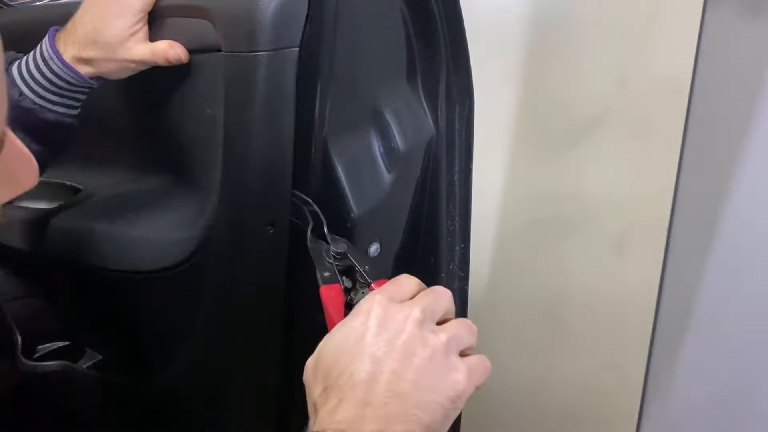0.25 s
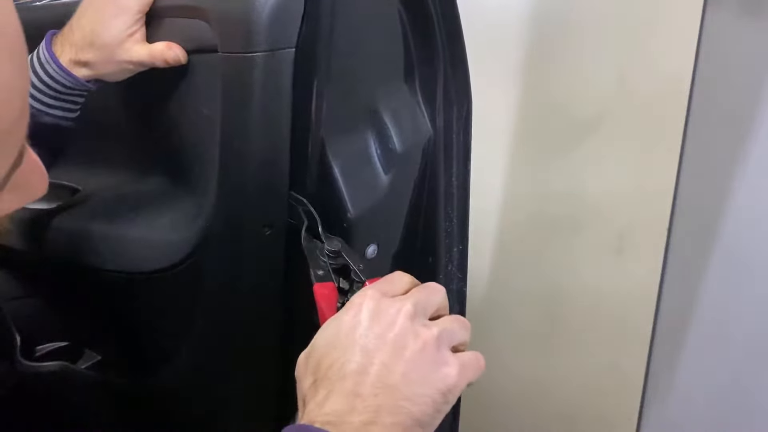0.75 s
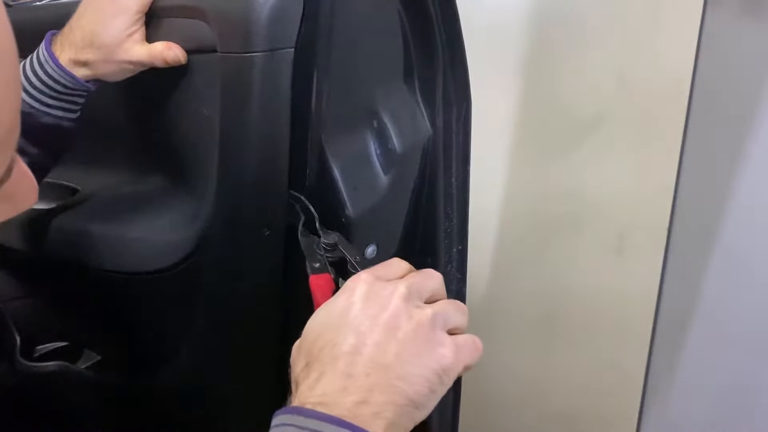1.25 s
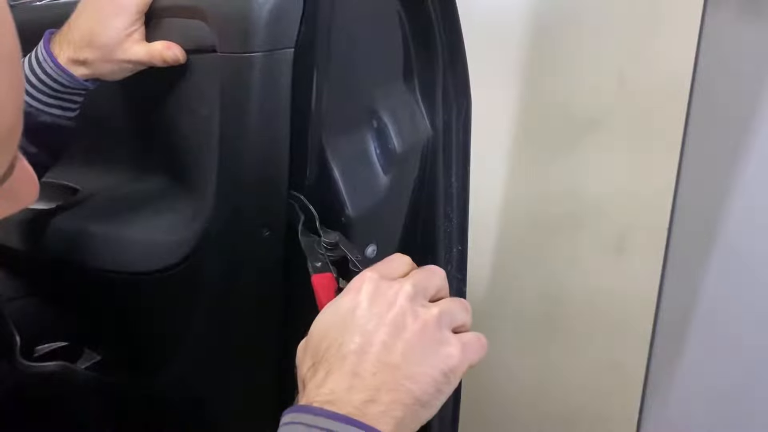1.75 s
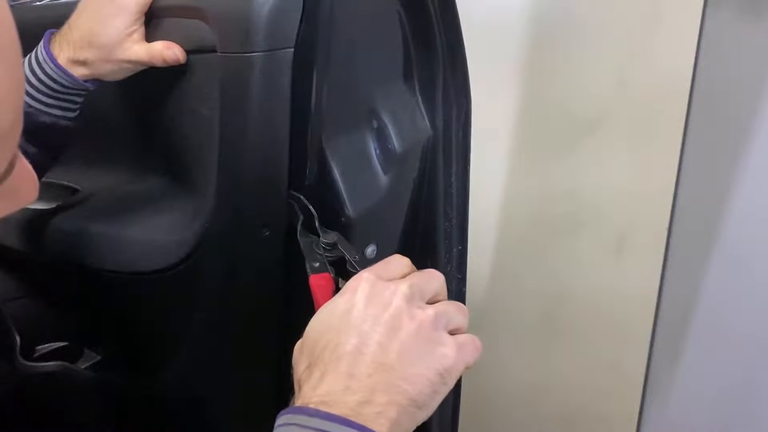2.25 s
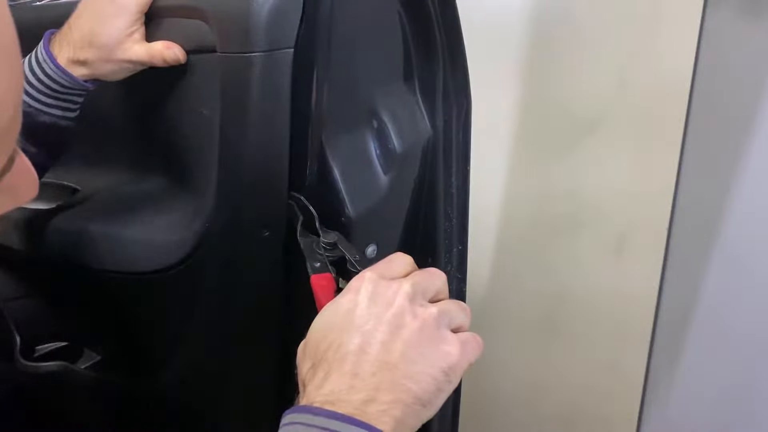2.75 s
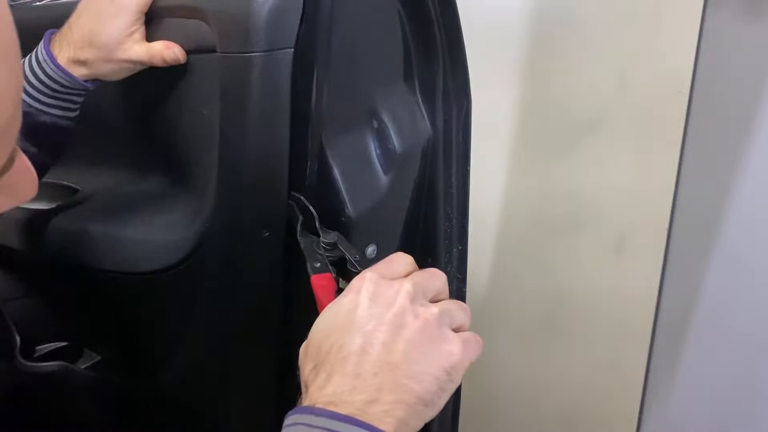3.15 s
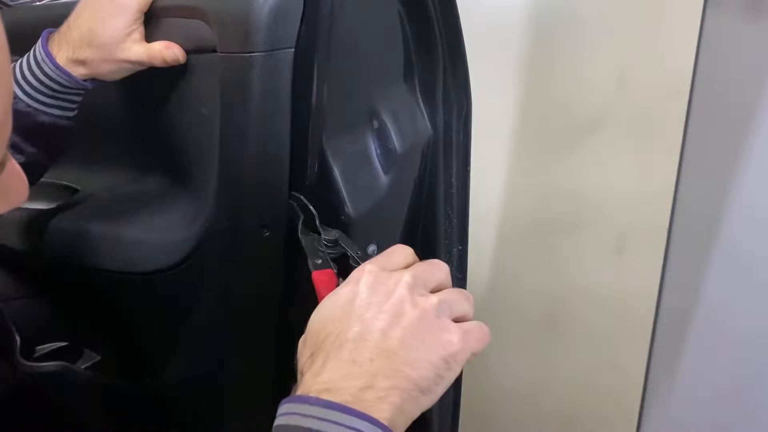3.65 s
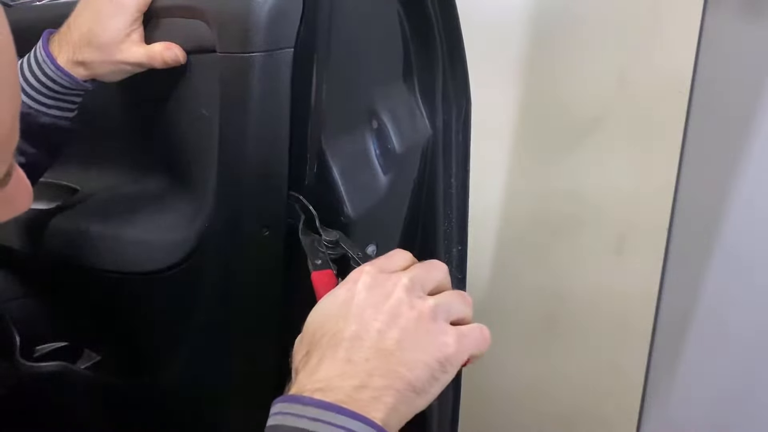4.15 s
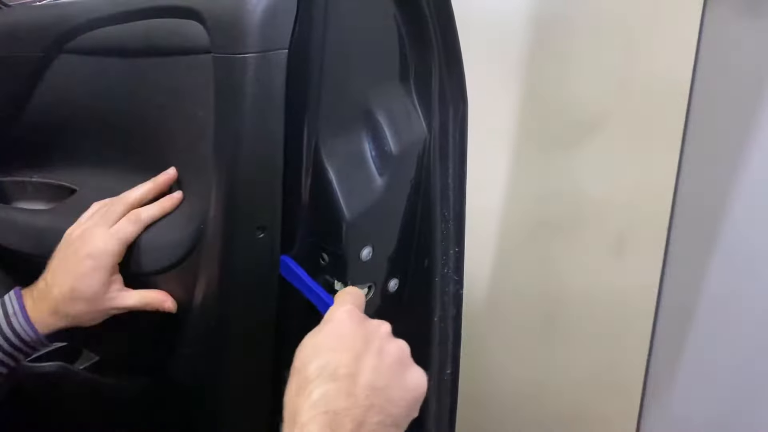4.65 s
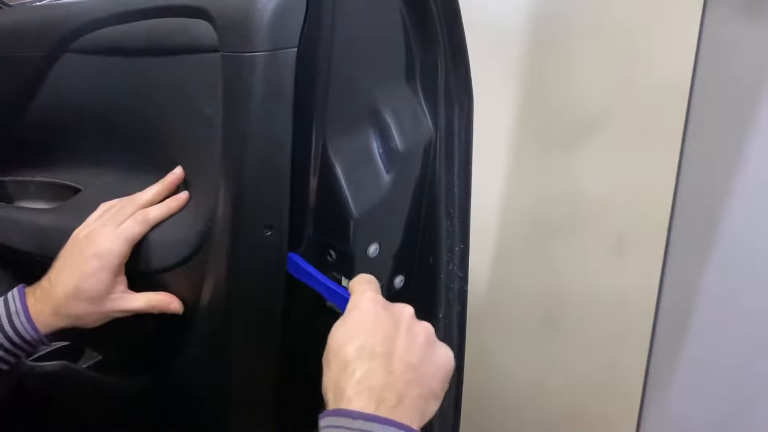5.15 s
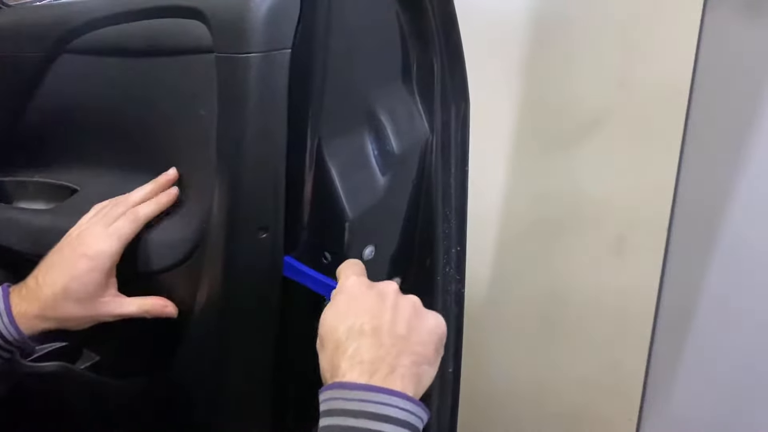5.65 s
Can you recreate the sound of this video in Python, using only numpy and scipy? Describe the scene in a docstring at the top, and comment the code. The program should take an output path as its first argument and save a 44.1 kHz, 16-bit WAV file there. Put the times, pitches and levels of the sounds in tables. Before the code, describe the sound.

A car door trim panel is pried loose with loud cracks, soft creaks and thuds, then a plastic lever scrapes faintly along its edge.

```python
"""A steel clip tool pries a plastic trim panel off a car door: shaped force spectra excite noisy, ringing plastic.
Dull slips, cracks and snaps ring the hollow door, and a dense, decaying workshop response answers.
Hand strokes and the scrapes of a plastic lever are random stick-slip noise; pushes add groans and door sway.
Low rumble and faint hiss lie beneath; at 4.241 s earlier knocks stop ringing, the hiss jumps up and settles."""
import sys
import numpy as np
from scipy import signal
from scipy.fft import rfft, irfft, next_fast_len
from scipy.io import wavfile
from scipy.ndimage import uniform_filter1d

SR = 44100
rng = np.random.default_rng(int(sys.argv[2]) if len(sys.argv) > 2 else 0)


def wrap_up_sound(samples):
    """Save the sound to the file named by the first command line argument, as 16-bit audio."""
    columns = np.atleast_2d(samples).T
    # keep every value between -1 and 1, then stretch to whole-number steps
    tamed = np.clip(columns, -1, 1)
    steps = np.round(tamed * 32767).astype(np.int16)
    wavfile.write(sys.argv[1], SR, steps)


N = 259912
TIME_S = np.arange(N) / SR
RING, TAIL = 8192, 32768  # samples: one release, one room response
RING_HZ = np.fft.rfftfreq(RING, 1 / SR)
CUT_S = 4.241  # earlier knocks stop ringing, hiss level steps
SWELL_DB = 20  # level change over one rise_s or fall_s


def amp(db):
    """Decibels to amplitude gain."""
    return 10 ** (np.asarray(db) / 20)


def unit(x):
    """Scale to rms 1."""
    return x / np.sqrt(np.mean(x ** 2) + 1e-20)


def along(points, hz):
    """Interpolate (frequency_hz, value) points on a log frequency axis."""
    point_hz, value = np.transpose(points)
    return np.interp(np.log(hz + 1), np.log(point_hz + 1), value)


def filtered(x, response):
    """Multiply the spectrum by a response of frequency."""
    size = next_fast_len(N + RING)
    hz = np.fft.rfftfreq(size, 1 / SR)
    return irfft(rfft(x, size) * response(hz), size)[..., :N]


def causal(gain):
    """Minimum-phase response: this gain, starting at once, with no ringing ahead."""
    cepstrum = irfft(np.log(np.maximum(gain, 1e-7)))
    fold = np.r_[1, np.full(RING // 2 - 1, 2), np.zeros(RING // 2)]
    return np.exp(rfft(cepstrum * fold))


def dying(t60s, size):
    """Stereo noise burst, energy flat over frequency, each frequency decaying at its own t60."""
    hz, t, bins = signal.stft(rng.standard_normal((2, size)), SR, nperseg=128)
    fade = np.exp(-np.log(1000) * t / along(t60s, hz)[:, None])
    fade_energy = np.linalg.norm(fade, axis=1, keepdims=True)
    burst = signal.istft(bins * fade / fade_energy, nperseg=128)[1][:, :size]
    return burst / np.sqrt(np.sum(burst ** 2) / 2)


# left-right correlation: frequency_hz, correlation
LIKENESS = [(60, 0.91), (130, 1), (290, 0.14), (700, 0.2), (3000, 0.042)]


def ports(pair, hz):
    """Mix two unrelated spectra to left and right; long waves reach both microphones nearly alike."""
    angle = np.arccos(np.clip(along(LIKENESS, hz), -1, 1)) / 2
    mid = pair[0] * np.cos(angle)
    side = pair[1] * np.sin(angle)
    return np.array([mid + side, mid - side])


def spread(pair, spectrum):
    """Two unrelated signals as one coloured stereo sound of rms 1."""
    size = next_fast_len(N)
    hz = np.fft.rfftfreq(size, 1 / SR)
    coloured = ports(rfft(pair, size), hz) * amp(along(spectrum, hz))
    return unit(irfft(coloured, size)[:, :N])


def swells(rows):
    """Gain of movements that rise and fall linearly in dB, summed in power."""
    power = 0
    for peak_s, level_db, rise_s, fall_s in rows:
        slope = np.maximum((peak_s - TIME_S) / rise_s, (TIME_S - peak_s) / fall_s)
        power = power + amp(level_db - SWELL_DB * slope) ** 2
    return np.sqrt(power)


def friction(rate_hz, uneven_db, smooth):
    """Stick and slip: noise gated by random small releases, over a smooth rush."""
    slips = (rng.random(N) < rate_hz / SR) * amp(uneven_db * rng.standard_normal(N))
    grip = signal.lfilter([1], [1, -np.exp(-1 / (.0012 * SR))], slips)  # 1.2 ms decay
    return (unit(grip) + smooth) * rng.standard_normal((2, N))


# room decay: frequency_hz, t60_s
ROOM_DECAY = [(70, 1), (200, 0.5), (1000, 0.62), (4000, 0.57), (8000, 0.39), (15000, 0.93)]
# room response spectrum: frequency_hz, level_db
ROOM_LEVEL = [(80, -1), (250, -9), (700, -10), (1500, -7.5), (4500, -6), (8000, -10), (15000, -24)]


def room(wall_s):
    """Diffuse workshop response, delayed until the nearest wall returns the sound."""
    hz = np.fft.rfftfreq(TAIL, 1 / SR)
    tail = irfft(ports(rfft(dying(ROOM_DECAY, TAIL)), hz) * amp(along(ROOM_LEVEL, hz)))
    return np.pad(tail, ((0, 0), (round(wall_s * SR), 0)))[:, :TAIL]


# spectrum of building rumble and door sway: frequency_hz, relative_density_db
RUMBLE_SPECTRUM = [(13, -44), (22, -21), (38, -4), (80, -2), (94, -8), (108, -13), (152, -14.5),
                   (183, -13.5), (312, -37.5), (500, -44.5), (650, -76), (1100, -120)]
# hiss spectrum: frequency_hz, relative_density_db
HISS_SPECTRUM = [(240, -28.5), (400, -6.5), (1420, -10.5), (1580, -15.5), (2510, -17.5), (10500, -27),
                 (13300, -26), (16000, -35)]
RUMBLE_DB, HISS_BEFORE_DB, HISS_AFTER_DB = -54.5, -74.5, -73
SETTLE_DB, SETTLE_S = -64.5, 0.61  # extra hiss at the cut, time to fall SWELL_DB


def workshop():
    """Low building rumble and faint hiss; the hiss jumps up at the cut, then settles."""
    rumble = amp(RUMBLE_DB) * spread(rng.standard_normal((2, N)), RUMBLE_SPECTRUM)
    settling = amp(SETTLE_DB - SWELL_DB * np.abs(TIME_S - CUT_S) / SETTLE_S)
    after = np.hypot(amp(HISS_AFTER_DB), settling)
    hiss_gain = np.where(TIME_S < CUT_S, amp(HISS_BEFORE_DB), after)
    return rumble + hiss_gain * spread(rng.standard_normal((2, N)), HISS_SPECTRUM)


# pushes that bend the panel: peak_s, level_db, rise_s, fall_s
PUSHES = [(0, -47, .1, 0.75), (1.35, -50, 0.077, 0.43), (1.48, -49.5, .15, .9), (2.75, -46.5, 1.17, 0.87),
          (3.03, -47, 0.88, 0.46), (3.9, -56.5, .4, 0.4), (4.42, -43.5, 0.052, 0.036),
          (4.59, -45, 0.056, 0.072), (4.77, -60.5, .15, .16), (5.38, -55, 0.071, 0.35)]
# groan spectrum: frequency_hz, relative_density_db
GROAN_SPECTRUM = [(15, -49.5), (40, -18), (80, 2.5), (170, 4.5), (300, -10), (500, -14), (900, -31.5),
                  (2500, -45), (6000, -81)]
SWAY_DB, SWAY_S = -1.5, .3  # relative to the push; the heavy door averages it over this time


def flexing():
    """Each push bends the panel in soft, low slips and sways the whole door."""
    push = swells(PUSHES)
    groan = push * spread(friction(rate_hz=150, uneven_db=0.0, smooth=0.93), GROAN_SPECTRUM)
    sway_gain = amp(SWAY_DB) * uniform_filter1d(push, size=round(SWAY_S * SR) + 1)
    sway = sway_gain * spread(rng.standard_normal((2, N)), RUMBLE_SPECTRUM)
    return groan + sway


# skin and sleeve strokes on the trim: peak_s, level_db, rise_s, fall_s
STROKES = [(.253, -52, 0.048, 0.021), (.38, -55.5, 0.27, 0.031), (4.41, -58, 0.022, .03),
           (4.45, -51, 0.012, 0.03), (4.56, -52, .17, 0.057), (5.54, -68.5, 0.07, .05),
           (5.68, -66, 0.032, 0.081), (5.763, -61.5, 0.0063, .02), (5.88, -60.5, 0.054, 0.074)]
# stroke spectrum: frequency_hz, relative_density_db
SKIN_SPECTRUM = [(470, -39), (800, -6.5), (1500, -12), (1630, -10.5), (6330, -8), (11800, -19),
                 (12900, -40), (14300, -20), (16000, -17)]


def sliding_hand():
    """Skin and sleeve hiss over the grained trim by fine stick-slip."""
    return swells(STROKES) * spread(friction(rate_hz=900, uneven_db=3, smooth=1.5), SKIN_SPECTRUM)


# lever scrapes along the panel edge: peak_s, level_db, rise_s, fall_s
SCRAPES = [(5.095, -57.5, 0.04, 0.11), (5.255, -39.5, 0.019, 0.086), (5.3, -32, 0.058, 0.017),
           (5.665, -54, 0.012, 0.11), (5.85, -53, 0.0069, .5)]
# scrape spectrum: frequency_hz, relative_density_db
EDGE_SPECTRUM = [(71, -39), (120, -26), (278, 4.5), (348, -16.5), (418, 2.5), (874, -3), (1750, -14),
                 (2590, -23.5), (10800, -38.5), (12800, -41), (13900, -44.5), (16000, -37.5)]


def scraping_lever():
    """The plastic lever grates along the panel edge by stick-slip."""
    return swells(SCRAPES) * spread(friction(rate_hz=900, uneven_db=2.5, smooth=.8), EDGE_SPECTRUM)


def rubbing():
    """Hand and lever friction, direct and answered by the room."""
    near = sliding_hand() + scraping_lever()
    answer = signal.fftconvolve(near, amp(-0.5) * room(wall_s=0.0014), axes=1)[:, :N]
    return near + answer


def resonance(hz, width_hz, db):
    """Boost in dB of one resonance over frequency."""
    return db / (1 + (2 * (RING_HZ - hz) / width_hz) ** 2)


YIELD_HZ, BASS_HZ = 434, 358  # panel gives way above; whole door joins in below
CONTACT_STEEPNESS = 6.1  # power exponent past the contact cut-off


def force(knock_db, contact_hz, bass_db, crack_db):
    """Force spectrum: a push, duller for soft contact, plus the flat crack of a hard edge."""
    panel = 1 + (RING_HZ / YIELD_HZ) ** 2
    contact = 1 + (RING_HZ / contact_hz) ** CONTACT_STEEPNESS
    bass = 1 / (1 + (RING_HZ / BASS_HZ) ** 4)
    return np.hypot(amp(knock_db + bass_db * bass) / np.sqrt(panel * contact), amp(crack_db))


# dense ring of the trim: frequency_hz, t60_s
PLASTIC_DECAY = [(100, 0.33), (300, 0.14), (800, 0.061), (2000, 0.14), (5000, 0.079), (14000, 0.042)]


def release(rise_s, rattle_db, direct_db, lag_s, sway_s, sway_hz):
    """Spectrum of plastic letting go: a direct click and a dense, rattling ring."""
    age_s = np.arange(RING) / SR
    rattle = amp(rattle_db * unit(uniform_filter1d(rng.standard_normal(RING), size=90)))
    ring = dying(PLASTIC_DECAY, RING) * rattle * (1 - np.exp(-age_s / rise_s))
    channel_lag_s = np.array([[0], [lag_s]])
    direct = amp(direct_db) * np.exp(-2j * np.pi * RING_HZ * channel_lag_s)
    # the panel is slow to move: below sway_hz notes lag by up to sway_s, so a knock sinks in pitch
    build_up = np.exp(-2j * np.pi * sway_s * sway_hz * np.arctan(RING_HZ / sway_hz))
    return (ports(rfft(ring), RING_HZ) + direct) * build_up


def blow(gain):
    """One release coloured by force and resonances; the last quarter fades out."""
    spectrum = release(rise_s=0.00038, rattle_db=3.0, direct_db=-14.5,
                       lag_s=0.00046, sway_s=.018, sway_hz=266.8)
    ring = irfft(spectrum * causal(gain))
    return ring * np.minimum(np.linspace(4, 0, RING), 1) ** 2


# slips and snaps: start_s, knock_db, contact_hz, bass_db, crack_db, low_mode_hz, high_mode_hz
BLOWS = [(-.025, 30.5, 8300, 0.5, 11, 267, 1100), (.025, 14.5, 6060, 4.5, -42, 246, 1120),
         (.216, 7.5, 1520, 10, -45, 596, 900), (.251, 8, 3100, -0.5, -33, 289.5, 2600),
         (.699, -9, 720, 4.5, -58, 544, 900), (.948, -1.5, 3850, 1.5, -49, 239, 2040),
         (1.086, -14.5, 9190, 13.5, -40, 230, 3060), (1.338, -20.5, 510, 21, -41, 488, 3500),
         (1.478, 9.5, 2140, 7, -32.5, 435, 1150), (1.695, 8.5, 2400, 11, -32.5, 424, 1020),
         (1.739, -8.5, 9310, 28, -28, 460, 990), (1.882, 11, 1950, -5, -37.5, 860, 2400),
         (1.934, 6.5, 1940, 11.5, -31.5, 600, 1340), (2.196, 7, 2080, 4.5, -35.5, 270, 1620),
         (2.373, 13.5, 2680, 6, -21, 298, 1830), (2.72, 16.5, 3470, 5.5, -20.5, 413, 2200),
         (2.991, -10, 910, 1.5, -53, 563, 1140), (3.032, 2, 2830, 16, -45.5, 247, 1390),
         (3.045, 0, 7650, 16.5, -40, 435, 2500), (3.223, -2.5, 620, 16.5, -56.5, 447, 1370),
         (3.419, -4.5, 1898, 12, -66.5, 810, 1390), (3.597, -9.5, 2070, 11.5, -59.5, 665, 2730),
         (3.71, 23.5, 7140, -5, 3.5, 260, 2360), (3.737, 23, 8810, -2.5, -2.5, 402, 2400),
         (3.923, 35, 9030, -3, 7.5, 792, 2550), (4.346, -9, 1900, 9, -38.5, 522, 1000),
         (4.385, -3, 1240, -9, -34, 241, 2370), (4.401, -17.5, 904, 13, -26.5, 243, 2780),
         (4.445, -14, 1500, 14.5, -26, 239, 4500), (4.712, -17, 2600, 14.5, -48.5, 776, 1610),
         (5.294, -3.5, 2530, 15.5, -36, 417.2, 1305), (5.652, -15, 2406, 11.5, -54, 533, 1218),
         (5.838, -11, 7900, -4, -38, 900, 1167)]
# door and trim resonances: frequency_hz, width_hz, boost_db
DOOR_MODES = [(203.9, 35, 9), (273, 74, 4.5), (426.3, 8.9, 7.5), (594, 19, 4.5), (655, 71, 3), (757, 74, 1),
              (1040, 17, 0.5), (1506, 360, 10.5), (1780, 160, 3), (2700, 110, 3), (4950, 250, 0)]
# broad colour of all blows: frequency_hz, level_db
BLOW_COLOUR = [(20, -33.5), (45, -21.5), (90, -10), (160, -7.5), (230, -2.5), (750, 4.5), (950, -0.5),
               (1250, -4.5), (1600, -6), (2500, -5.5), (3400, -3.5), (4600, 1.5), (7000, -0.5),
               (11000, 0.5), (13300, -6), (15500, -3)]
# resonance boost averaged over all directions: frequency_hz, boost_db
MEAN_BOOST = [(120, 4), (250, 6.5), (1600, 3), (6000, -4.5)]
HIGH_MODE_DB, HIGH_MODE_GROWTH = 7, .05  # boost; added dB per dB of knock


def prying():
    """Panel slips and clip snaps ring door and room; earlier knocks stop ringing at the cut."""
    out = np.zeros((2, N + 2 * TAIL))
    answers = [room(wall_s=.012) for _ in range(5)]
    door_db = sum(resonance(*mode) for mode in DOOR_MODES)
    for k, (start_s, knock_db, contact_hz, bass_db, crack_db, low_mode_hz, high_mode_hz) in enumerate(BLOWS):
        # each blow has its own low and high resonance boost, varying irregularly from blow to blow
        low_mode_db = resonance(low_mode_hz, width_hz=0.19 * low_mode_hz, db=5.5)
        high_boost_db = HIGH_MODE_DB + HIGH_MODE_GROWTH * knock_db
        high_mode_db = resonance(high_mode_hz, width_hz=0.3 * high_mode_hz, db=high_boost_db)
        modes_db = door_db + low_mode_db + high_mode_db
        push = force(knock_db, contact_hz, bass_db, crack_db)
        near = blow(push * amp(along(BLOW_COLOUR, RING_HZ) + modes_db))
        # the room gathers all sides of the door, which evens the resonances out
        evening = causal(amp(0.57 * (along(MEAN_BOOST, RING_HZ) - modes_db)))
        all_round = irfft(rfft(near) * evening)
        hit = signal.fftconvolve(all_round, answers[k % len(answers)], axes=1)[:, :TAIL]
        hit[:, :RING] += near
        heard = (start_s > CUT_S) | (start_s + np.arange(TAIL) / SR < CUT_S)
        first = TAIL + round(start_s * SR)
        out[:, first:first + TAIL] += hit * heard
    return amp(-0.49) * out[:, TAIL:TAIL + N]


# stereo balance: frequency_hz, left_minus_right_db
BALANCE = [(60, -5), (200, -5), (400, 1.5), (1300, 1.6), (2400, 0), (4400, 4), (8000, -1), (15000, 0)]


def scene():
    """All layers; bass leans right, mids and lower treble mostly slightly left."""
    sound = workshop() + flexing() + rubbing() + prying()

    def lean(hz):
        gain = amp(along(BALANCE, hz) * np.array([[.5], [-.5]]))
        return gain / np.sqrt(np.mean(gain ** 2, axis=0))

    return filtered(sound, lean)


LOW_HZ, TOP_HZ = 33.13, 16200  # microphone bass cut-off, band limit


def record(dry):
    """Microphones lose the deepest bass, peaks saturate near full scale, then a steep band limit."""
    heard = filtered(dry, lambda hz: hz ** 4 / np.sqrt(hz ** 8 + LOW_HZ ** 8))
    clipped = heard / (1 + np.abs(heard) ** 16) ** (1 / 16)
    return filtered(clipped, lambda hz: 1 / (1 + (hz / TOP_HZ) ** 120))


dry = scene()
out = record(dry)
wrap_up_sound(out)
```